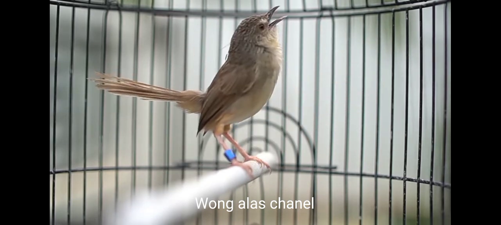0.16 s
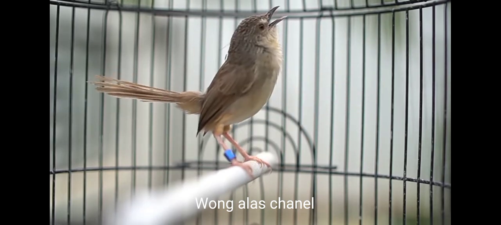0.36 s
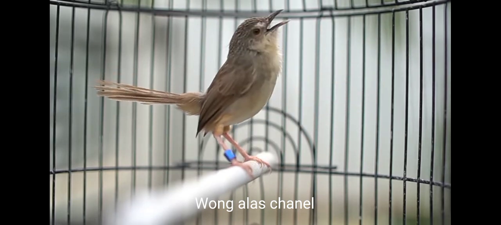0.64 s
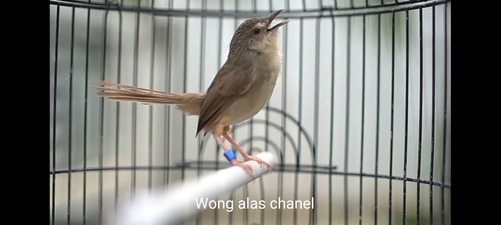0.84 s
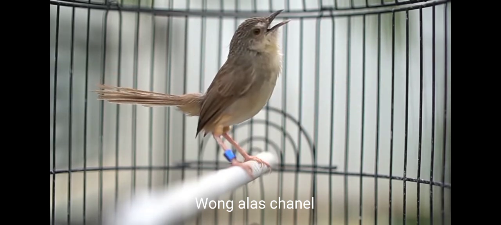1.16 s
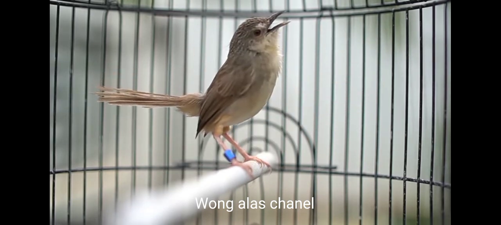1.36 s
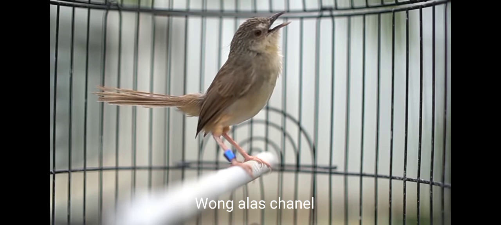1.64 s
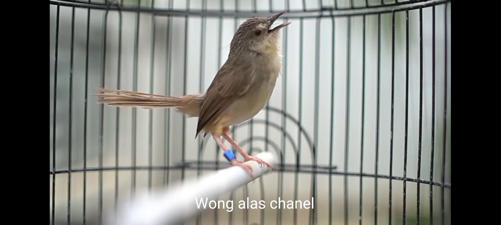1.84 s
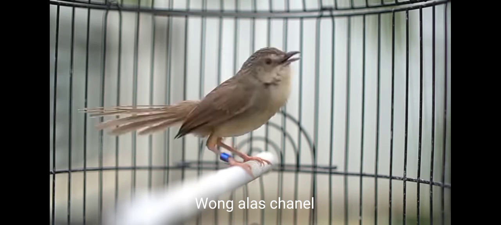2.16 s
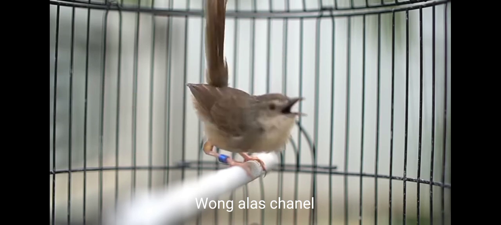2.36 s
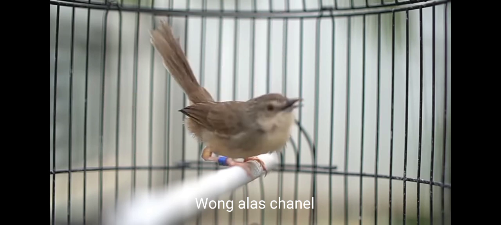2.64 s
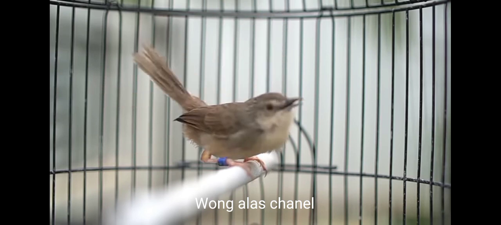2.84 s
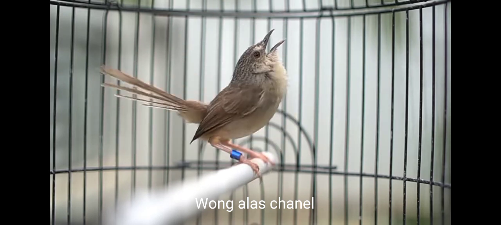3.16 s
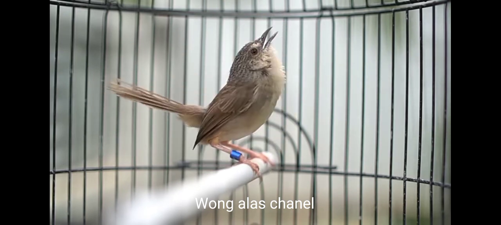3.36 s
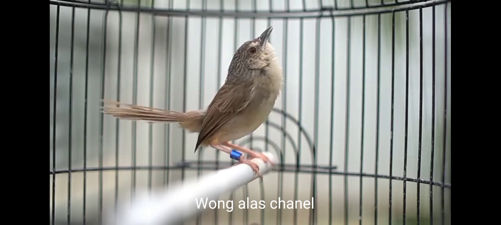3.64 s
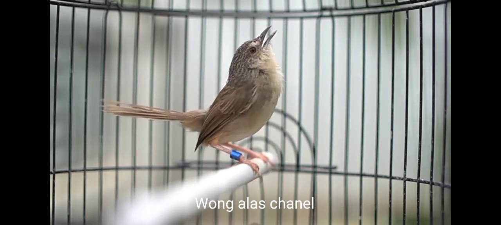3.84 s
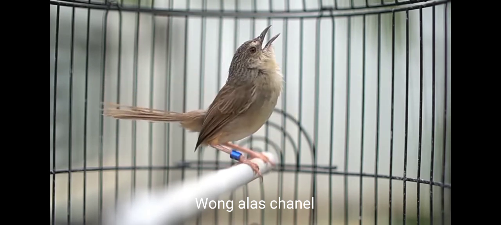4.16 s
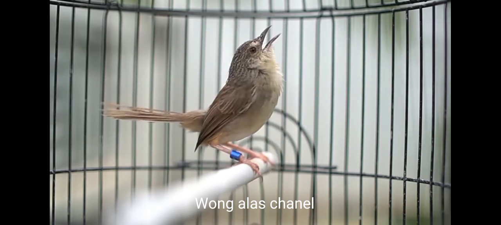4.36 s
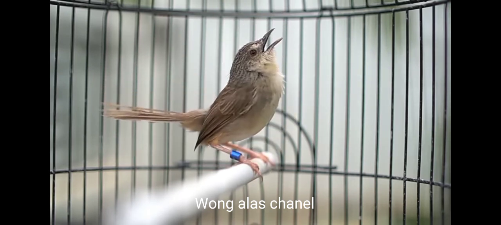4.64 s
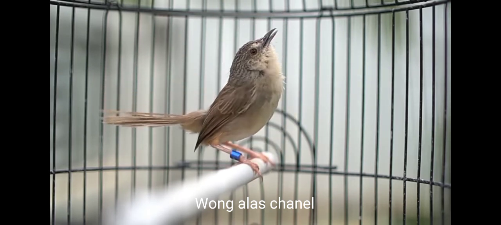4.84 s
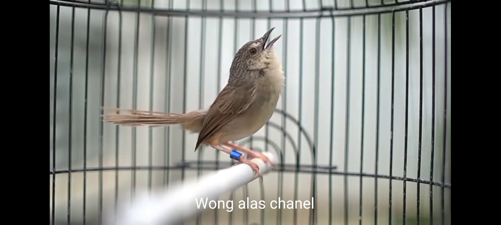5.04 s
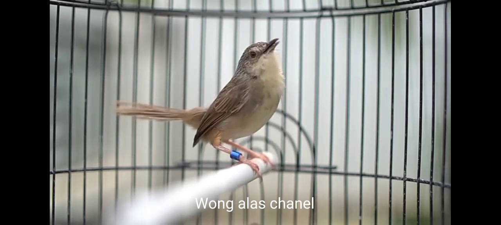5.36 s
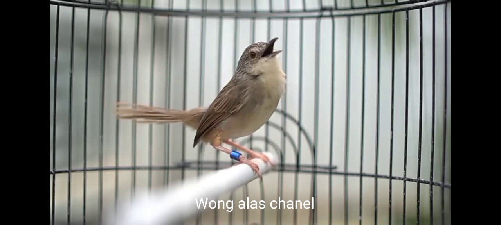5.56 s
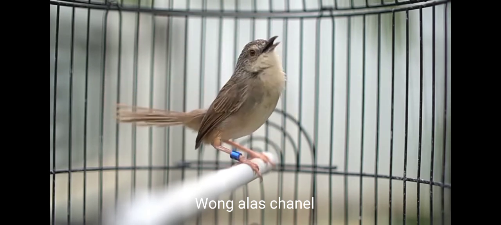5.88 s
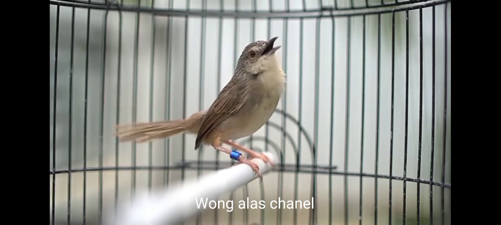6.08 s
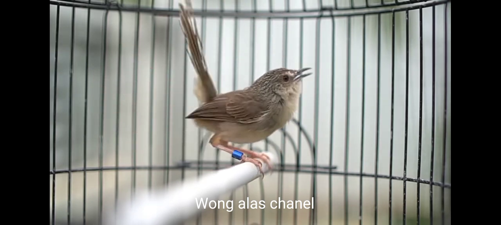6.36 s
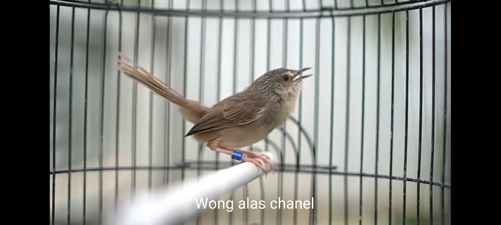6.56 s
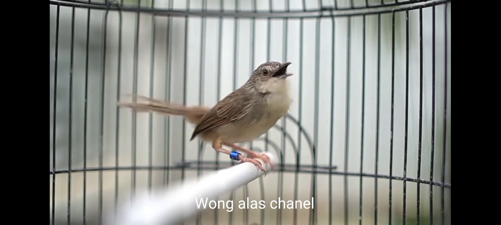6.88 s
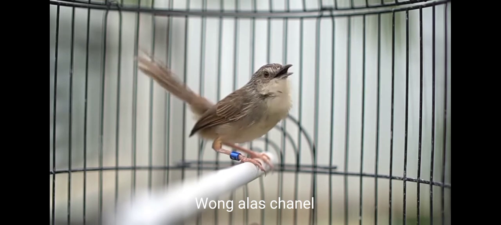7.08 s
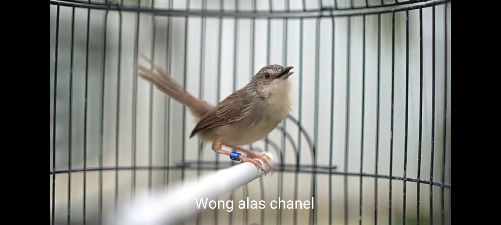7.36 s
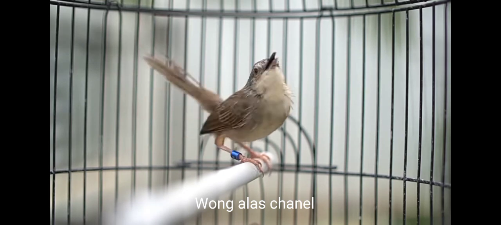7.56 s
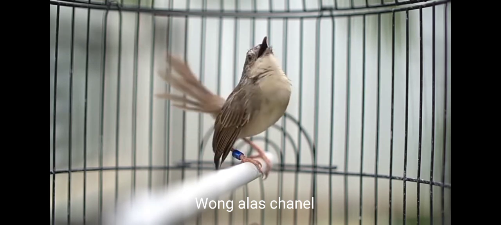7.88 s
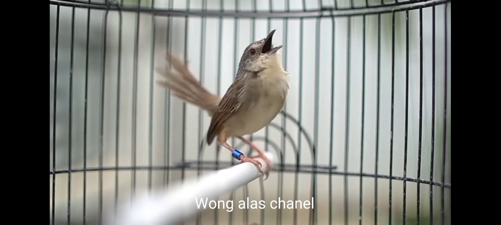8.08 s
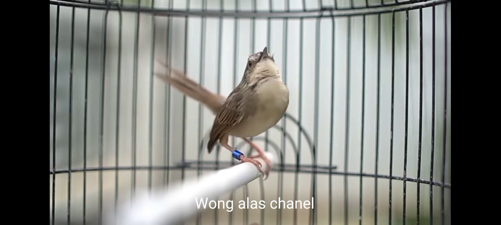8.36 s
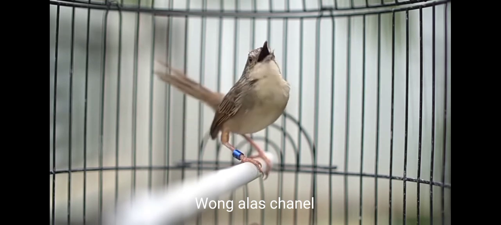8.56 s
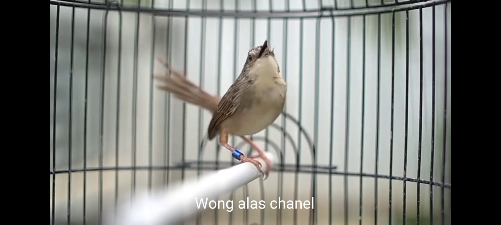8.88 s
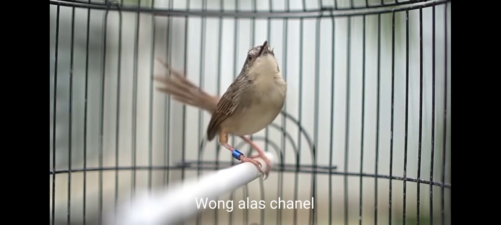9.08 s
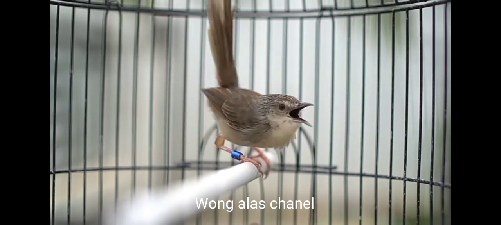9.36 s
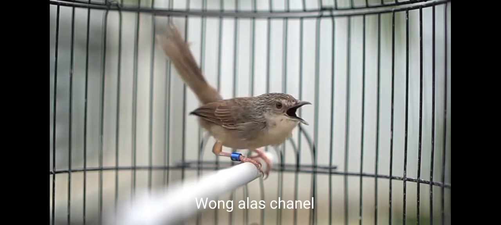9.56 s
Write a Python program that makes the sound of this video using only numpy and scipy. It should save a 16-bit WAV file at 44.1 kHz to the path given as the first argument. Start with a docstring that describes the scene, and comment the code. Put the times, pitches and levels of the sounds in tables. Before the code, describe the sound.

A small caged songbird close by sings two runs of sharp falling whistles and fast trills, over faint rasping birds and dry ticks.

```python
"""A yard, where a small caged songbird sings two runs of sharp falling whistles close by:
drawn-out opening notes, a hooked note, a fast trill, then long arched notes. Each is a gliding tone
with overtones. Further off, other birds rasp and buzz (shaped noise), amid whistles and one low hoot
(quavering tones). Something ticks drily near the cage (short ringing tones); soft bumps, rumble, hiss
and a thin shrill are filtered noise. Walls send back echoes."""
import sys
import numpy as np
from scipy import signal
from scipy.fft import rfft, irfft
from scipy.io import wavfile
from scipy.ndimage import uniform_filter1d, minimum_filter1d

SR = 44100
rng = np.random.default_rng(int(sys.argv[2]) if len(sys.argv) > 2 else 0)


def unload_audio(sound):
    """Save the sound as a 16-bit wav file, at the path given as the first command line argument."""
    columns = np.transpose(np.atleast_2d(sound))
    # keep every value between -1 and 1, then stretch to whole-number steps
    steps = np.round(np.clip(columns, -1, 1) * 32767)
    wavfile.write(sys.argv[1], SR, steps.astype(np.int16))


N = 428211
T = np.arange(N) / SR
TOP_HZ = 15800  # highest frequency let through


def songbird():
    """The voice organ sings each note; a bounce off the cage ripples it, and air hisses in the beak."""
    # turbulent air in the beak, columns: f/Hz, level/dB
    beak_air = [(1500, -38), (3500, -8), (7000, -16.5), (9500, -6), (12000, -9), (15000, -15.5),
                (16000, -24.5)]
    song = np.zeros(N)
    for top_s, falls_ms, top_hz, up_db, high_db, low_db in syllables():
        t, sound = note(top_hz, falls_ms, up_db, high_db, low_db)
        start_s = top_s + t[0]
        add(song, sound, start_s)
        # the path by way of the cage shifts from note to note as the bird moves
        bounce_s = rng.uniform(.0005, .0011)
        add(song, .18 * sound, start_s + bounce_s)
    loudness = uniform_filter1d(np.abs(song), size=200)
    return song + undb(-43) * loudness * noise(beak_air)


def syllables():
    """Four kinds of note share out the fall differently; yields top time/s, stages/ms, top pitch/Hz, three dB."""
    # drawn-out opening slides, columns: t/s at the top, fall/ms, added level/dB
    slides = [(2.0172, 81.4, -1.5), (4.6772, 85, -4), (4.9205, 87.6, -2), (5.1621, 87.7, 0)]
    # hooked notes that launch the trills, column: t/s at the top
    hooks = [2.2063, 5.384]
    # three stages of a hooked note's fall: duration/ms
    hook_stages_ms = (30.2, 18, 7)
    # trill notes, slowing through each run, column: t/s at the top
    trill = [2.3058, 2.3842, 2.4661, 2.5478, 2.6301, 2.715, 2.801, 2.8889, 2.9815, 3.075, 3.1692, 3.264,
             3.3636, 5.4795, 5.5575, 5.6396, 5.721, 5.805, 5.8905, 5.9769, 6.0626, 6.1526, 6.243, 6.336,
             6.43, 6.5282, 6.6276]
    # a slower beat leaves time to voice the upstroke, columns: beat/s, added level/dB
    trill_upstroke = [(.087, -17), (.094, 1.5)]
    # long arched notes, columns: t/s at the top, fall/ms
    arches = [(3.5019, 86.5), (6.7746, 85), (6.9486, 100.7), (7.1442, 102.5), (7.3466, 104.5),
              (7.547, 104.7), (7.7486, 108), (7.9639, 113.2), (8.185, 104), (8.3891, 113.4), (8.6052, 113),
              (8.836, 116.2), (9.057, 114.6), (9.2687, 111.8), (9.479, 119), (9.7012, 340)]
    # voice of each kind, columns: top pitch f/Hz, upstroke level/dB, upper fall level/dB, lower fall level/dB
    slide_voice = (7664.5, -41.5, -24.5, -25.5)
    hook_voice = (7657, -22, -23.5, -40)
    trill_voice = (7871, -24.5, -22.5, -32.5)
    arch_voice = (7565.5, -21.5, -24.5, -27.5)

    top_hz, *levels_db = slide_voice
    first_ms, second_ms = 6.8, 21.5  # the lowest stage takes the rest
    for s, fall_ms, db in slides:
        stages_ms = (first_ms, second_ms, fall_ms - first_ms - second_ms)
        yield s, stages_ms, top_hz, *np.add(levels_db, db)

    for s in hooks:
        yield s, hook_stages_ms, *hook_voice

    # a trill note fills a steady share of the beat up to the next note, so it lengthens as the trill slows
    onsets = np.array(trill + [s for s, _ in arches])
    top_hz, up_db, high_db, low_db = trill_voice
    second_ms = 15.27
    for s in trill:
        beat_s = onsets[onsets > s].min() - s
        fall_ms = 0.43 * 1000 * beat_s
        first_ms = 0.087 * 1000 * beat_s
        stages_ms = (first_ms, second_ms, fall_ms - first_ms - second_ms)
        added_db = np.interp(beat_s, *np.transpose(trill_upstroke))
        yield s, stages_ms, top_hz, up_db + added_db, high_db, low_db

    low_ms, first_share = 23.2, 0.46  # lowest stage; the first stage's share of what is left
    for s, fall_ms in arches:
        upper_ms = fall_ms - low_ms
        yield s, (first_share * upper_ms, (1 - first_share) * upper_ms, low_ms), *arch_voice


def note(top_hz, falls_ms, up_db, high_db, low_db):
    """The voice organ flicks up to a top pitch, then slides down while the air pressure runs out."""
    # overtones, the half ones from period doubling, columns: multiple of the pitch, level/dB
    overtone_levels = [(.5, -19), (1.5, -28), (2, -19), (2.5, -64), (3, -23.5), (4, -68)]
    # how throat and beak pass the overtones, columns: f/Hz, level/dB
    throat = [(1400, -58), (2000, -17.5), (2800, -12), (3700, -8.5), (5500, 4), (7300, 3.5), (9000, -2),
              (10500, -3), (12000, 5.5), (13500, 8), (15200, 7.5), (15800, -12.5)]
    # pitches on the way: start, upstroke, ends of the three stages of the fall, bottom, end
    start_hz, upstroke_hz, low_hz, end_hz = 3600, 5200, 2550, 1950
    first_hz, second_hz, third_hz = 6800, 4600, 3100
    rise_s, longest_drop_s = 0.0095, 0.011

    # times are counted from the top of the note
    first, second, third = np.cumsum(falls_ms) / 1000
    # the last slope carries on to the bottom of the range, where the pitch collapses
    bottom = third + (third - second) * (third_hz - low_hz) / (second_hz - third_hz)
    end = bottom + longest_drop_s * min((third - second) / 0.026, 1) ** 2
    t = np.arange(-1.3 * rise_s, end + 0.0044, 1 / SR)
    hz = np.interp(t, [-rise_s, -.57 * rise_s, 0, first, second, third, bottom, end],
                   [start_hz, upstroke_hz, top_hz, first_hz, second_hz, third_hz, low_hz, end_hz])
    # the longer the top is held, the rounder the start of the fall
    held = min(first / .036, 1)
    rounded = top_hz + (first_hz - top_hz) * np.abs(t / first) ** (1.5 + 0.37 * held)
    hz = np.where((t > 0) & (t < first), rounded, hz)
    # the muscles flick fast but relax slowly, so the lower bend is soft
    relaxed = np.interp(t, [first, (first + second) / 2, third, end], [0, 1, 1, 0])
    bend_s = min(.8 * (second - first), .02)
    soft_hz = uniform_filter1d(hz, size=int(bend_s * SR))
    quick_hz = uniform_filter1d(hz, size=70)
    hz = relaxed * soft_hz + (1 - relaxed) * quick_hz
    # a quick waver and a slower sway of the pitch
    hz = hz * (1 + .0049 * wander(t, 350) + .005 * wander(t, 45))

    # strength in columns t/s, level/dB: it dips at a sharp turn and fades before the end
    fade_from = max(end - .028, (second + third) / 2)
    strength = [
        (t[0], up_db - 45),
        (-.75 * rise_s, up_db - 15),
        (-.33 * rise_s, up_db - 3),
        (0, (up_db + high_db) / 2 - 11 * (1 - held)),
        (first, high_db + 1),
        ((first + second) / 2, high_db - 3),
        (second, (high_db + low_db) / 2),
        (fade_from, low_db - .5),
        ((fade_from + end) / 2, low_db - 7),
        (end, low_db - 20),
        (t[-1], low_db - 64)]
    # the throat resonance favours some pitches, columns: f/Hz, level/dB
    resonance = [(2000, -15), (3400, 1), (7200, 1.5), (7650, -4), (8100, 16.5)]
    pressure = undb(np.interp(t, *np.transpose(strength))) * gain_at(hz, resonance)

    phase = 2 * np.pi * np.cumsum(hz) / SR
    overtones = 0
    for multiple, db in overtone_levels:
        overtone_hz = multiple * hz
        flutter_db = 3 * wander(t, 127.3)
        level = undb(db + flutter_db) * gain_at(overtone_hz, throat)
        overtones += level * (overtone_hz < TOP_HZ) * np.sin(multiple * phase)
    # held notes are pushed harder and sound brighter than brief ones
    brightness = undb(5 * held - 20)
    return t, pressure * (np.sin(phase) + brightness * overtones)


def ticks():
    """Hard little contacts ring at several pitches for a few milliseconds and rebound faintly."""
    # dry ticks before a shared boost, columns: t/s, level/dB
    tick_list = [(0.5496, -29), (1.3877, -28), (1.7794, -28), (2.2538, -35), (2.8379, -35), (3.8477, -37),
                 (4.3685, -31), (4.9856, -34), (5.4675, -30), (6.3031, -44), (6.8783, -34), (7.4454, -35),
                 (8.105, -35), (8.6068, -35)]
    # what a tick rings with, columns: f/Hz, time to fall by 60 dB/s, level/dB
    modes = [(520, .004, -15), (950, .003, -13), (2120, .003, -9), (2390, .008, 0), (4300, .002, -11),
             (5800, .002, -10), (7000, .003, -5), (11500, .0012, -13)]
    boost_db, rebound_db, lag_s = 8, -27, .0007
    out, t = np.zeros(N), np.arange(SR // 50) / SR
    for s, db in tick_list:
        detune = rng.normal(1, .015)
        rebound_s = rng.uniform(.02, .032)
        ring = np.zeros(len(t))
        for k, (hz, t60, mode_db) in enumerate(modes):
            level = undb(mode_db + 2 * rng.standard_normal() - 60 * t / t60)
            # neighbouring modes start in opposite directions
            ring += (-1) ** k * level * np.sin(2 * np.pi * hz * detune * t)
        add(out, undb(db + boost_db) * ring, s + lag_s)
        add(out, undb(db + boost_db + rebound_db) * ring, s + rebound_s)
    # so small a body radiates little bass
    return signal.sosfilt(signal.butter(2, 2000, "high", fs=SR, output="sos"), out)


def rasps():
    """A second bird keeps a steady beat through each bout, rasping through its throat."""
    # bouts of rasps, columns: start t/s, end t/s, time between rasps/s, length of a rasp/s
    bouts = [(-.023, 1.9, .1244, 0.062), (4.798, 6.75, .235, 0.11)]
    # loudness of the rasps before a shared boost, columns: t/s, level/dB
    loudness = [(0, -54.5), (.36, -55), (.55, -49.5), (.75, -54), (1.7, -52), (1.9, -54), (5.05, -53),
                (5.6, -59.5), (6, -57), (6.7, -54)]
    # throat colour, columns: f/Hz, level/dB
    colour = [(1500, -44), (2400, -10.5), (3200, -4.5), (3900, -0.5), (4600, -4), (5800, -2), (6900, -7.5),
              (7900, 1.5), (9400, -20.5), (11000, -9.5), (12500, -17), (14000, -28), (16000, -51)]
    calls = []
    for start, end, beat, length in bouts:
        for s in np.arange(start, end, beat):
            calls.append((s, length, np.interp(s, *np.transpose(loudness))))
    return harsh_calls(calls, colour, boost_db=2)


def buzzes():
    """Faint high buzzes from further off, made as toneless calls."""
    # the buzzes before a shared boost, columns: t/s, length/s, level/dB
    calls = [(3.87, 0.051, -67), (4.09, 0.16, -65), (4.41, 0.098, -63)]
    # throat colour, columns: f/Hz, level/dB
    colour = [(2500, -16), (4000, -10.5), (5200, 4.5), (7000, 9.5), (7800, -15), (12000, -48)]
    return harsh_calls(calls, colour, boost_db=5)


def harsh_calls(calls, colour, boost_db):
    """Toneless calls: a chaotic, fluttering voice organ heard through fixed throat resonances."""
    swell = np.zeros(N)
    for s, length, db in calls:
        t = np.arange(0, length, 1 / SR)
        add(swell, undb(db + boost_db) * arch(t, length), s)
    flutter = undb(4 * wander(T, 350))
    return swell * noise(colour) * flutter


def whistles_and_hoot():
    """Far-off whistles and one low hoot: pure tones that quaver as they glide upward."""
    # the tones before the yard softens them, columns: t/s, length/s, starting f/Hz, level/dB
    tones = [(.184, 0.21, 1390, -71.5), (.675, .39, 1607, -66), (.747, 0.48, 2380, -74),
             (1.203, .22, 1710, -60), (1.55, .18, 934, -58), (3.161, 0.079, 228, -55),
             (3.69, 0.34, 2310, -72.5), (4.115, 0.15, 1716, -63), (5.831, 0.083, 1060, -71),
             (6.85, 0.58, 2280, -68), (7.389, 0.073, 1880, -61), (9.183, .35, 1883, -74.5),
             (9.252, .4, 1276, -80)]
    out = np.zeros(N)
    for s, length, first_hz, db in tones:
        t = np.arange(0, length, 1 / SR)
        quaver = 1 + .04 * wander(t, 110)
        climb = 1 + .06 * t / length
        phase = 2 * np.pi * np.cumsum(first_hz * climb * quaver) / SR
        add(out, undb(db) * arch(t, length) * np.sin(phase), s)
    return out


def bumps():
    """Soft, dull knocks somewhere in the yard: low noise that swells quickly and dies away."""
    # the bumps, columns: t/s, length/s, level/dB
    bump_list = [(2.83, .2, -71), (4.89, 0.21, -76.5)]
    # their muffled colour, columns: f/Hz, level/dB
    colour = [(80, -21), (170, 0), (330, 4), (650, -6), (1000, -16), (3000, -45)]
    swell = np.zeros(N)
    for s, length, db in bump_list:
        t = np.arange(0, length, 1 / SR)
        add(swell, undb(db) * arch(t, length) * (1 - t / length), s)
    return swell * noise(colour)


def background():
    """Low rumble and soft hiss as shaped noise, with a thin shrill, like a far insect, as a narrow band."""
    # colour of the yard's noise, columns: f/Hz, level/dB
    yard = [(25, -16), (45, 0), (130, -1), (180, -8.5), (350, -13.5), (600, -20.5), (1000, -14),
            (1400, -15.5), (2100, -11.5), (3300, -9.5), (5200, -4.5), (7000, -8), (9000, -16), (14000, -23),
            (16000, -33)]
    # its loudness before small random changes, columns: t/s, level/dB
    yard_level = [(0, -70.5), (.8, -67.5), (2.1, -66), (3.7, -76), (5.3, -65), (5.7, -74), (7, -73),
                  (7.8, -79.5), (9.7, -78.5)]
    level_db = np.interp(T, *np.transpose(yard_level))
    air = noise(yard) * undb(level_db + wander(T, 12))
    shrill_hz, shrill_db = 4860, -72
    narrow_band = [(shrill_hz * .9, -60), (shrill_hz * .988, 0), (shrill_hz * 1.012, 0), (shrill_hz * 1.1, -60)]
    shrill = noise(narrow_band) * undb(shrill_db + wander(T, 11))
    return air + shrill


def slaps(sound):
    """Each near wall returns a distinct, faint copy of the sound."""
    # reflections off the nearest walls, columns: delay/s, level/dB
    walls = [(.014, -27.5), (.026, -28.5), (.041, -34)]
    out = np.zeros(N)
    for delay_s, db in walls:
        add(out, undb(db) * sound, delay_s)
    return out


def echoes(sound, early_t60, late_t60):
    """Scattered reflections: a strong and a softer layer, each fading by 60 dB in its own time (s)."""
    # colour of the reflections, columns: f/Hz, level/dB
    colour = [(500, -16.5), (2200, -2.5), (3800, -2), (6000, -6), (7500, -9.5), (10000, -12), (16000, -3)]
    t = T[:SR * 3 // 4]
    grain = noise(colour)[:len(t)] * undb(0.37 * wander(t, 650))
    fading = undb(-60 * t / early_t60) + undb(-8 - 60 * t / late_t60)
    response = grain * fading * (t > .0019)  # a short gap before the first reflection
    unit_energy = response / np.linalg.norm(response)
    return signal.fftconvolve(sound, unit_energy)[:N]


def undb(db):
    """Decibels to gain."""
    return 10 ** (np.asarray(db) / 20)


def add(out, x, s):
    """Mix x into out from time s, cutting off whatever falls outside."""
    i = int(round(s * SR))
    x, i = x[max(-i, 0):], max(i, 0)
    out[i:i + len(x)] += x[:max(N - i, 0)]


def gain_at(hz, points):
    """Gain at the given frequencies, read from a curve of (f/Hz, level/dB) points."""
    f, db = np.transpose(points)
    return undb(np.interp(np.log(hz + 1), np.log(f), db))


def noise(points):
    """Random noise with the given spectrum and an rms level of 1."""
    spectrum = rfft(rng.standard_normal(N))
    x = irfft(spectrum * gain_at(np.fft.rfftfreq(N, 1 / SR), points), N)
    return x / x.std()


def wander(t, rate):
    """Random values joined by straight lines, rate of them a second."""
    values = rng.standard_normal(4096)
    return np.interp((t - t[0]) * rate, np.arange(len(values)), values)


def arch(t, length):
    """Smooth swell and fade over length seconds."""
    return np.sqrt(np.abs(np.sin(np.pi * np.clip(t / length, 0, 1))))


def scene():
    """The singer and ticks are close and nearly dry; the sounds further off come mostly by way of the walls."""
    near = songbird() + ticks()
    neighbours = rasps() + buzzes()
    to_walls = undb(-19.5) * near + undb(-5) * neighbours
    reflected = slaps(near) + echoes(to_walls, early_t60=0.15, late_t60=0.49)
    far = undb(-3) * echoes(whistles_and_hoot(), early_t60=0.86, late_t60=0.46)
    return (near + undb(-11) * neighbours + reflected + far + bumps() + background())[None]


def record(dry):
    """A fast limiter holds the loudest notes to one height; a steep filter then cuts the top."""
    ceiling_db, window = -20, 180  # window in samples
    wanted = np.minimum(1, undb(ceiling_db) / (np.abs(dry) + 1e-9))
    gain = uniform_filter1d(minimum_filter1d(wanted, size=window), size=window)
    top_cut = signal.ellip(10, .1, 80, TOP_HZ, fs=SR, output="sos")
    return signal.sosfilt(top_cut, gain * dry)


dry = scene()
out = record(dry)
unload_audio(out)
```